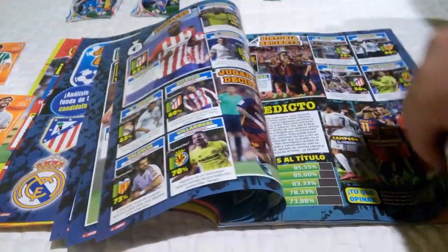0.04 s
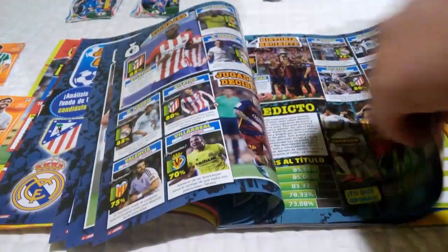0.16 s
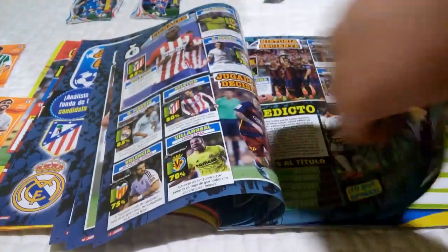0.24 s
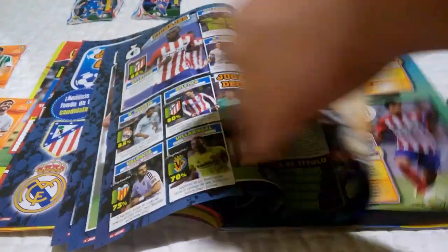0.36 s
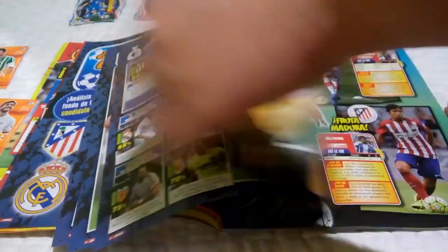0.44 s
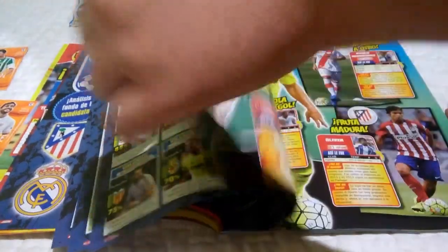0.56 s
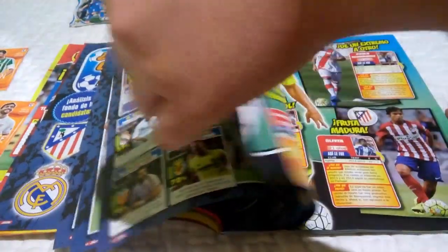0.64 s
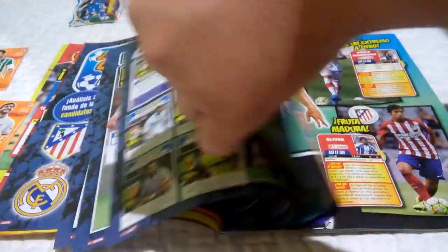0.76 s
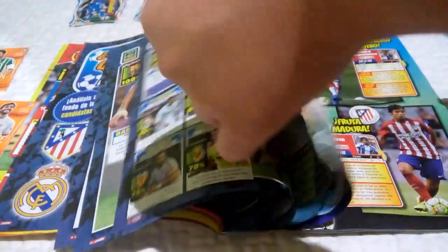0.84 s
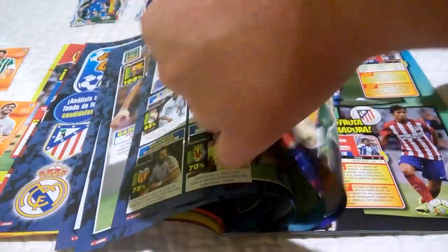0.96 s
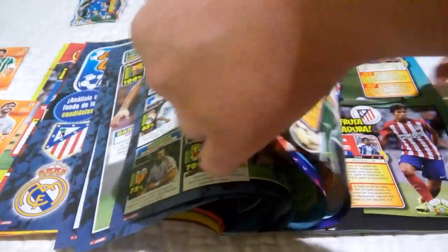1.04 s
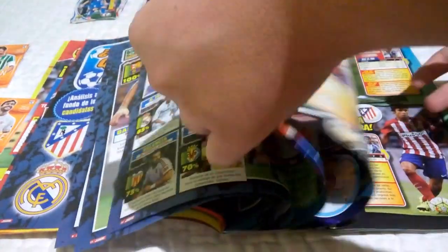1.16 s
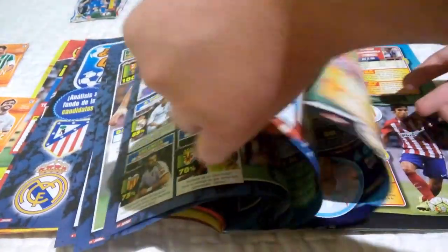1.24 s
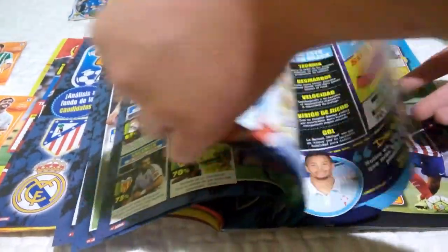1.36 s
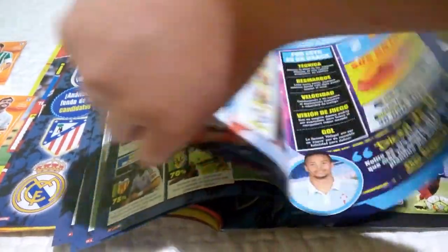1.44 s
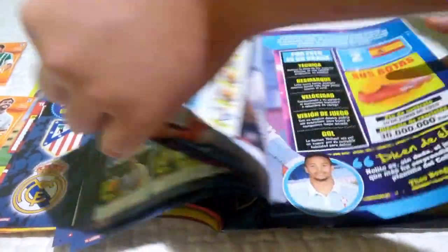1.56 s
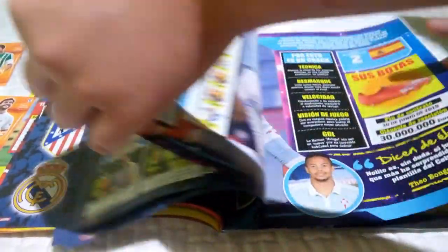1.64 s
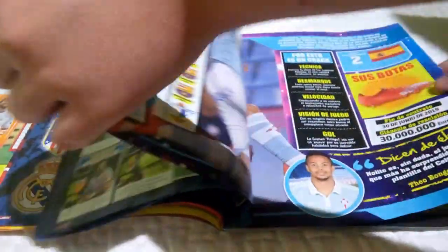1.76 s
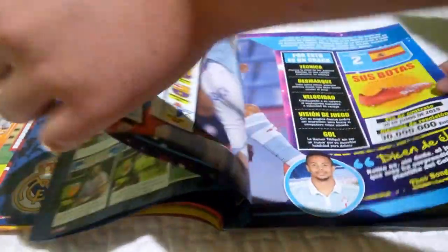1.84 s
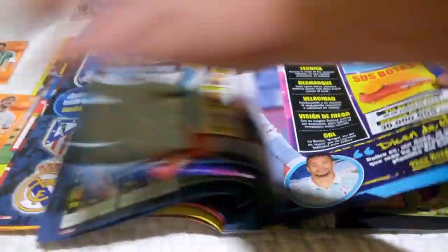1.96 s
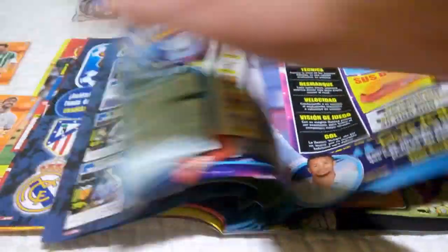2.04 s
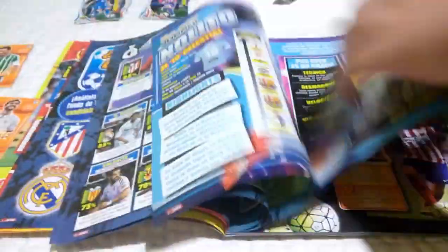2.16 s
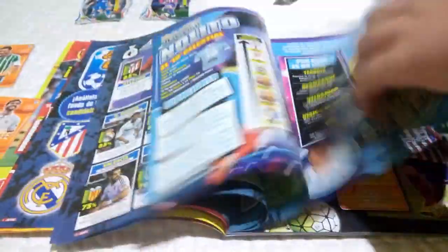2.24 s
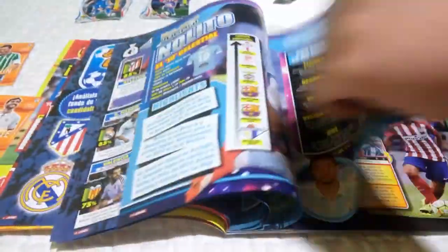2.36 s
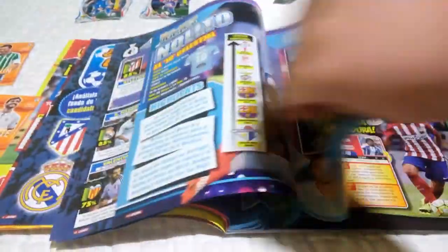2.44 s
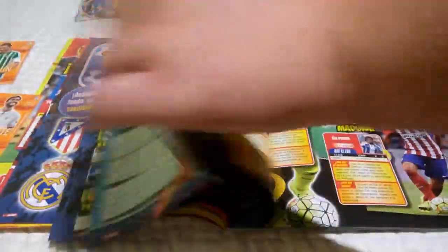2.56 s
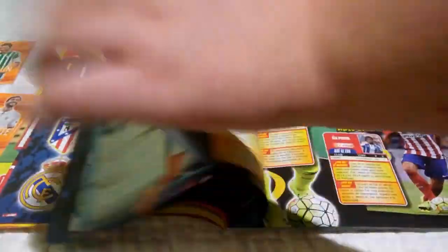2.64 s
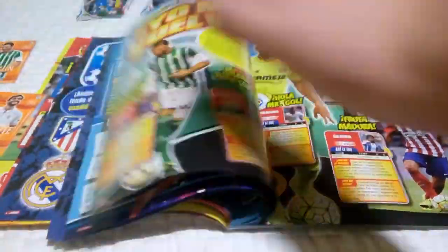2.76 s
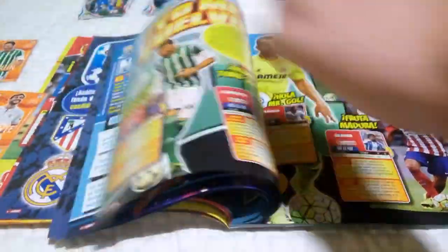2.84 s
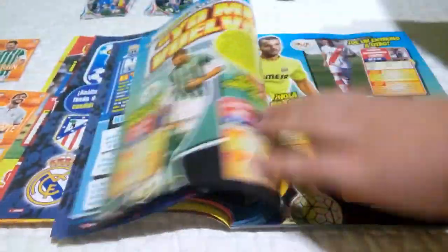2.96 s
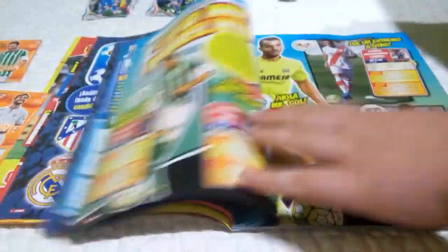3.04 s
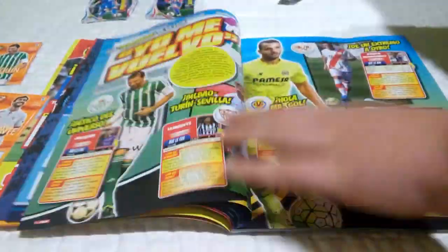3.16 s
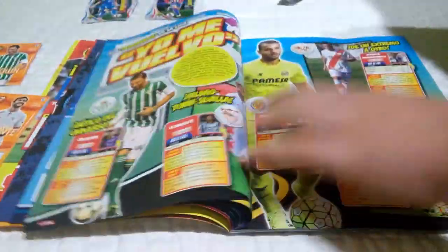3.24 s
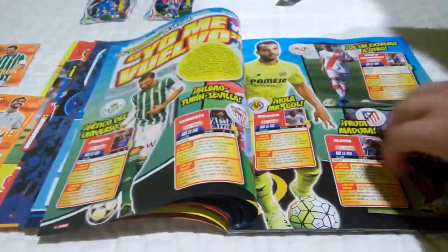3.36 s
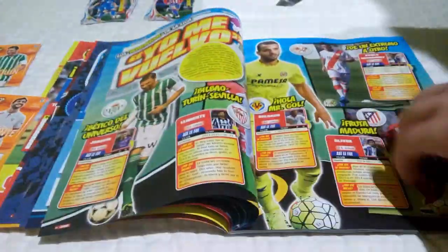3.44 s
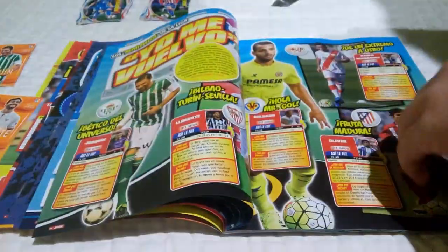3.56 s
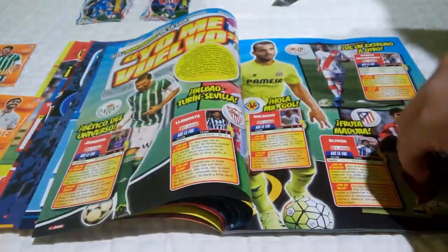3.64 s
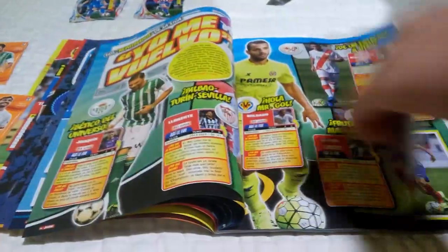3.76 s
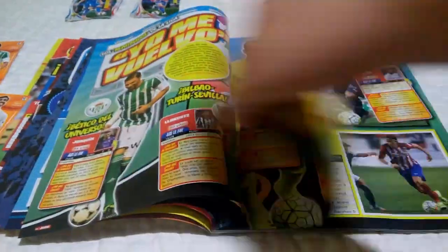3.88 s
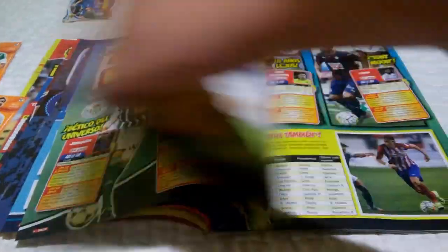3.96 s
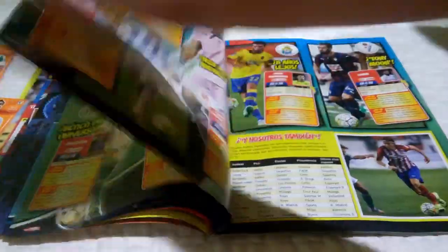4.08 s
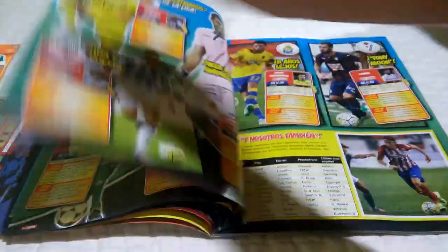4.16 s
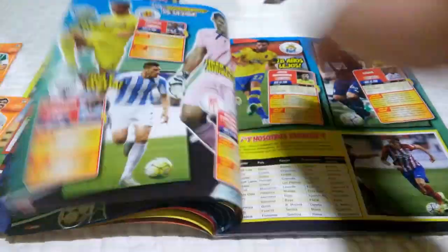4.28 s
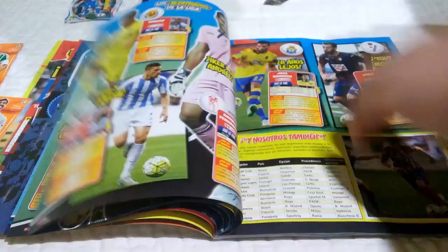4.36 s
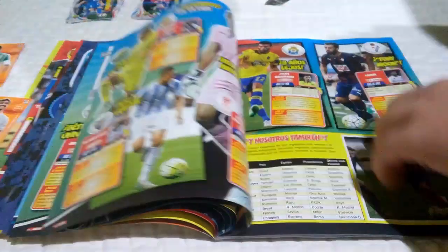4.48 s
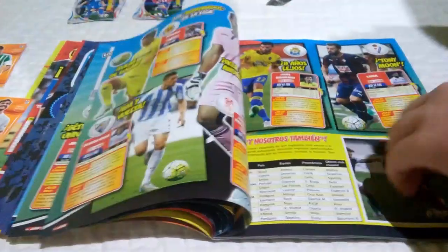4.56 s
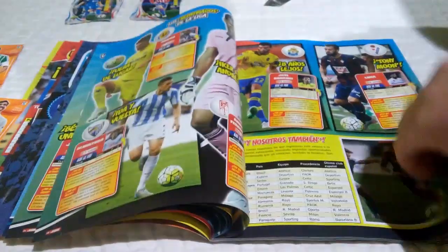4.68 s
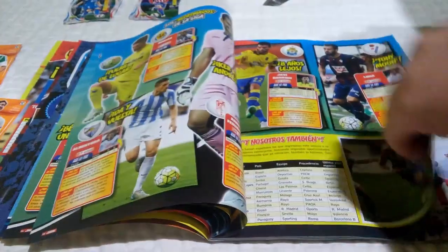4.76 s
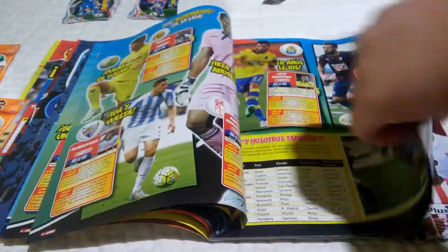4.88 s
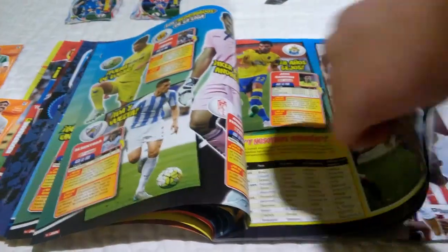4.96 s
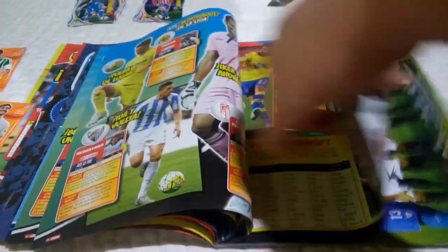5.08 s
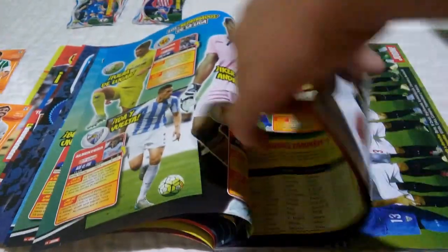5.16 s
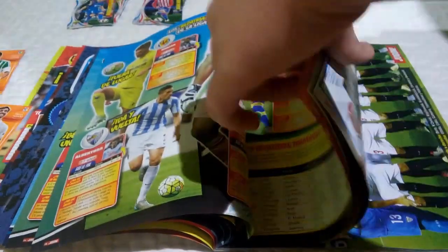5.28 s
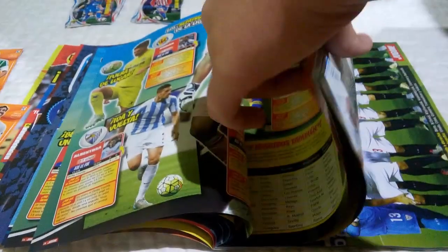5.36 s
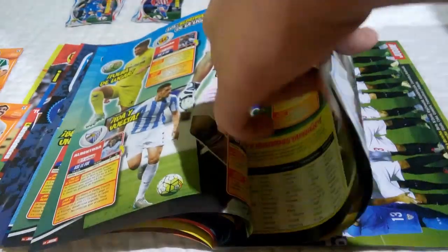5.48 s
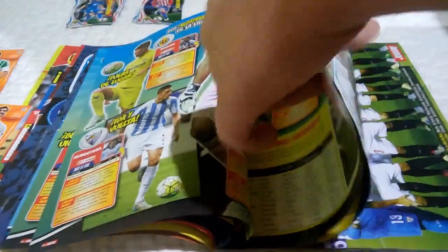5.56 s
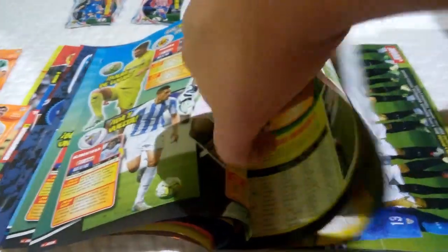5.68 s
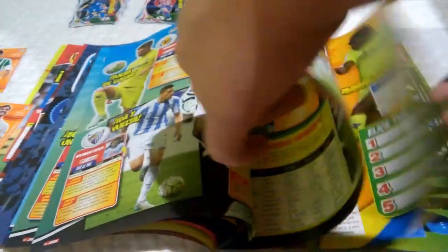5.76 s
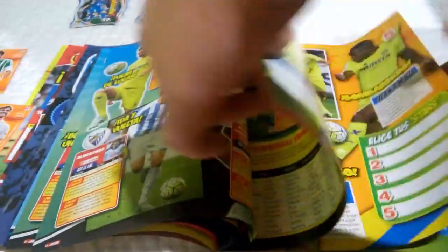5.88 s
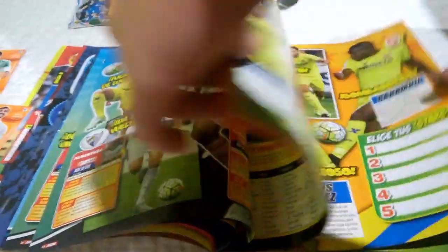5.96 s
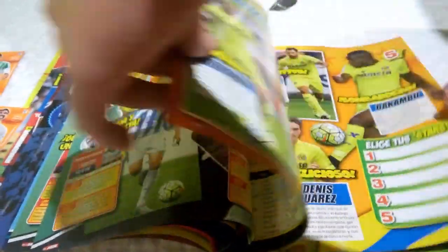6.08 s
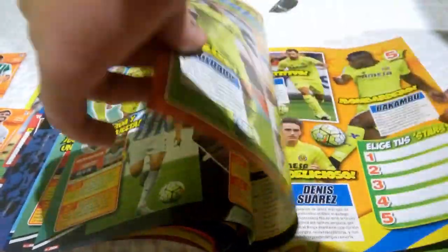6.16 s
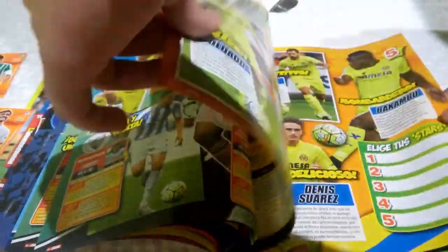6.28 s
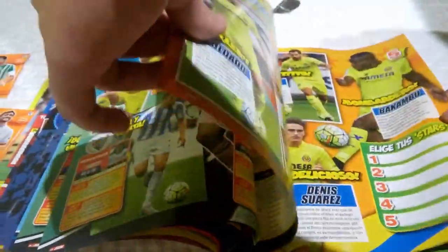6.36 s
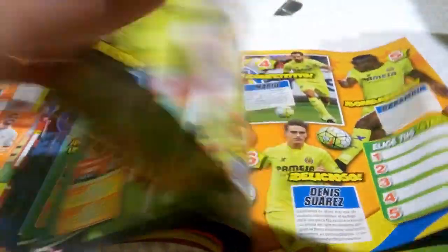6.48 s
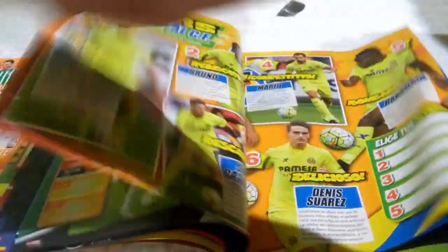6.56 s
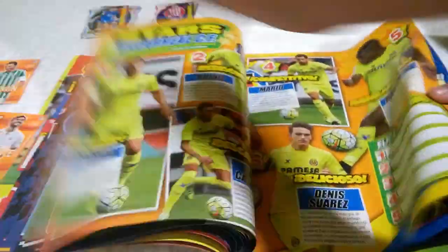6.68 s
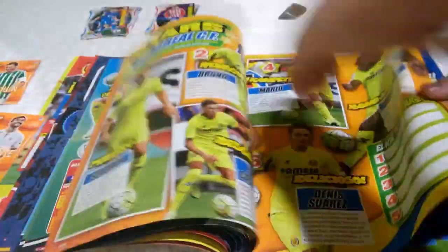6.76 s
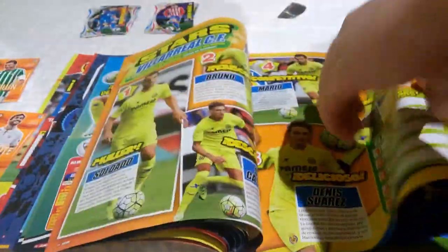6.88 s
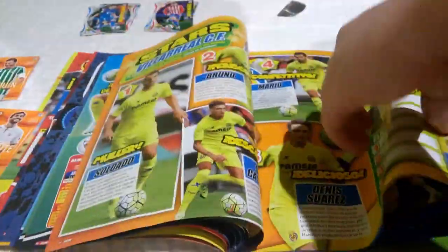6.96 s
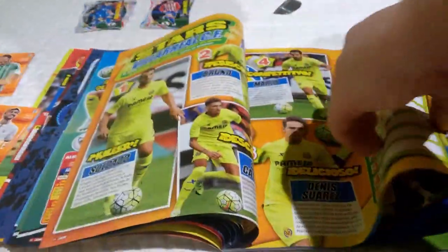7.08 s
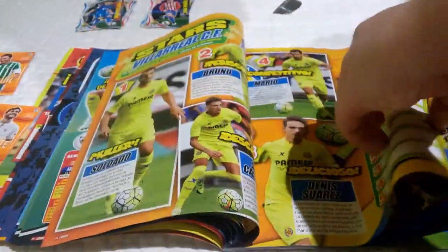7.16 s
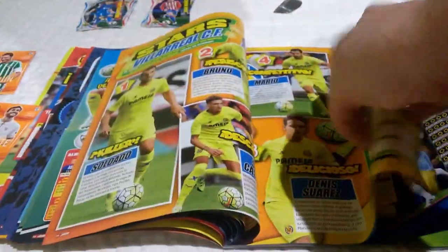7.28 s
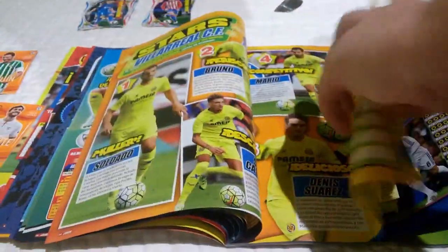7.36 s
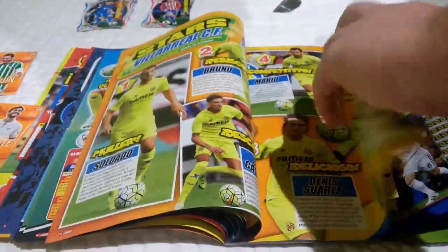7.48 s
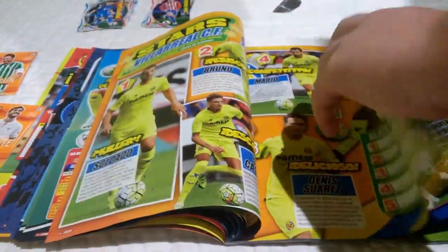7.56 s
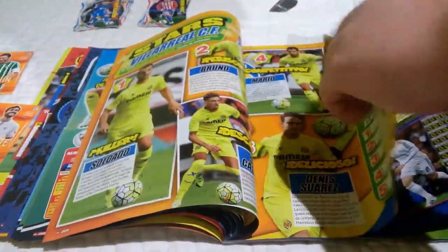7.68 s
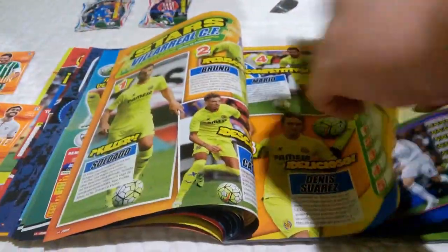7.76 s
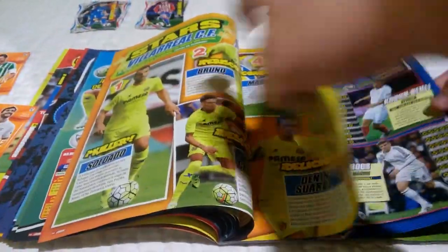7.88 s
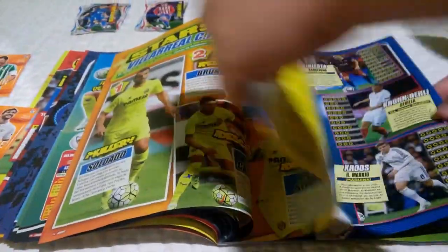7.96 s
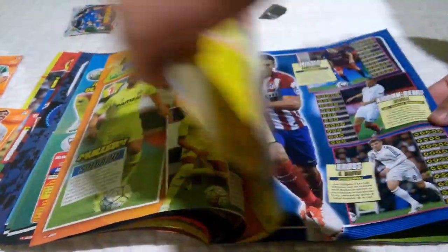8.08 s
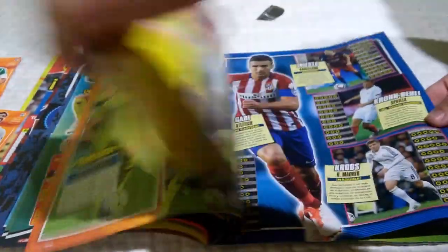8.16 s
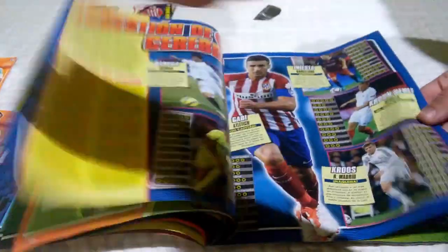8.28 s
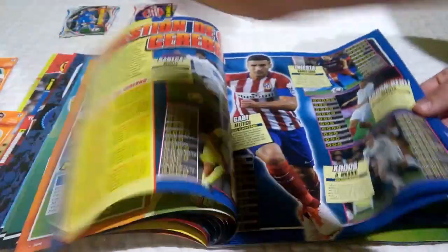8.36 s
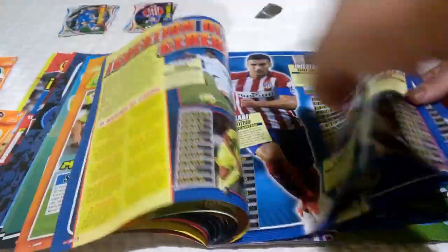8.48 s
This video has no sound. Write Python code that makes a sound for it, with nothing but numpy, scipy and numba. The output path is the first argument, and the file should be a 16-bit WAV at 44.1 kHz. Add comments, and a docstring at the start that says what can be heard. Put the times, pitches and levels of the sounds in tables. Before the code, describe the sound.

Glossy magazine pages are turned by hand, with crisp crackles, sliding rustles and soft flaps at irregular intervals in a quiet room.

```python
"""Glossy magazine pages turned by hand on a bed cover, an arm's length from a small microphone.
Fingers slide over the gloss and creases snap; sheets flap and push low puffs of air near 0.7 s and 2.5 s.
Lighter handling follows from 3 s, then the loudest turns at 6.3-6.8 s and 7.7 s, and rustle to the end.
Throughout, the nearest page echoes and a soft room answers briefly over faint hiss.
The microphone port peaks near 6 kHz and falls steeply above."""
import sys
import numpy as np
from scipy import signal
from scipy.fft import rfft, irfft
from scipy.io import wavfile
from scipy.ndimage import uniform_filter1d, map_coordinates
from numba import njit

SR = 44100
rng = np.random.default_rng(int(sys.argv[2]) if len(sys.argv) > 2 else 0)


def waveform_to_disk(signal):
    """Save audio, clipped to [-1, 1], as 16-bit WAV at the path in sys.argv[1]."""
    frames = np.transpose(np.atleast_2d(signal))
    scaled = np.clip(frames, -1, 1) * 32767
    samples = np.round(scaled).astype(np.int16)
    wavfile.write(sys.argv[1], SR, samples)


N = 376173

# Snapping creases: t/s, crack level/dB, crack f/Hz, sheet level/dB, sheet f/Hz,
# nominal rise/ms, fall/ms, sharpness
CREASES = [(0.02, -62, 4300, -57, 2150, 4, 6, 2.2), (0.088, -36, 6220, -57, 1980, 0.32, 0.87, 3.0),
           (0.0955, -32, 6440, -51, 1670, 0.5, 0.86, 2.1), (0.1113, -48, 5320, -62, 1350, 11, 5.4, 4),
           (0.3263, -42, 5520, -54, 1900, 10, 6.0, 7.9), (0.417, -54, 5430, -62, 1680, 7.2, 6.0, 2),
           (0.436, -46, 5000, -46.5, 1930, 0.3, 1.8, 2.6), (0.6949, -48, 4330, -42, 1608, 2.1, 2.7, 6),
           (0.718, -41, 3680, -50, 1724, 1.7, 2.3, 5.3), (0.736, -30.5, 4940, -41, 2150, 0.69, 1.2, 1.6),
           (0.7526, -21.5, 4180, -28, 1925, 3.6, 3.6, 3.8), (0.7607, -31, 4580, -30, 1856, 1.6, 3, 1.4),
           (0.7661, -49, 4500, -33, 1904, 1.7, 4.9, 1.6), (0.7755, -34.5, 5230, -39, 1850, 0.82, 2, 1.8),
           (0.9696, -59, 5870, -55, 1670, 2, 5, 3.3), (1.0191, -71, 5240, -48.5, 1730, 0.3, 9, 7.2),
           (1.0746, -40, 4170, -46, 1750, 0.52, 4.2, 4.8), (1.0834, -61, 4220, -45, 1410, 10, 5.4, 2.2),
           (1.126, -48.5, 4420, -40.5, 1870, 0.3, 4.5, 4.2), (1.1456, -60, 4150, -51, 1510, 9.3, 6.0, 2.1),
           (1.1993, -59.5, 4060, -53, 1634, 4.7, 3.2, 2.4), (1.2527, -66, 4130, -54.5, 1560, 2.2, 5, 2.5),
           (1.379, -62, 5000, -62, 1760, 1, 2.8, 2.5), (1.455, -65, 3900, -61, 1800, 1, 3, 2.5),
           (1.6256, -41.5, 5570, -59, 1760, 20, 4.3, 8.1), (1.7223, -55, 3950, -53, 1970, 3, 5, 3.6),
           (1.742, -56, 4070, -45.5, 2100, 2.5, 2.7, 7.1), (1.857, -65, 4660, -51.5, 1400, 0.27, 2, 3.6),
           (1.9, -57, 4310, -54.5, 2230, 0.78, 3, 2.6), (2.0152, -57.5, 4900, -65, 1360, 2.2, 7.9, 1.1),
           (2.078, -70, 4150, -57, 1670, .5, 5, 3), (2.1411, -50.5, 4650, -46.5, 1710, 5.8, 9.8, 2.5),
           (2.1769, -49.5, 3700, -45, 1657, 17, 7.1, 1.6), (2.3617, -36, 5370, -39, 1750, 0.23, 1.8, 3.2),
           (2.369, -34.5, 5000, -32.5, 1770, 4, 7.1, 1.2), (2.3745, -40, 5200, -39, 1850, 0.59, 9.5, 1.3),
           (2.451, -46, 5900, -57, 1740, 8.6, 2.5, 3.5), (2.4569, -52, 4550, -40, 1950, 4.5, 7.5, 1),
           (2.4662, -35, 3730, -38.5, 1973, 6.8, 4.1, 1.3),
           (2.499, -38.5, 4570, -38.5, 1270, 3.3, 4.9, 0.93), (2.5193, -38, 4270, -36.5, 1570, 9.2, 11, 1),
           (2.5314, -39.5, 3680, -43, 1360, 8.0, 33, 1.6), (2.552, -47, 4350, -47, 1580, 1, 3.9, 1.3),
           (2.6005, -52.5, 4930, -53, 1650, 8.8, 3.7, 1.6),
           (2.7331, -38.5, 4600, -41.5, 1750, 16, 4.5, 2.2), (2.7443, -44, 5020, -47, 1535, 8.5, 2.8, 1.5),
           (2.9021, -55.5, 4440, -51, 1450, 2.8, 8.7, 4.3), (2.9417, -53, 4230, -58, 1670, 0.54, 1.8, 4.4),
           (3.084, -61, 5600, -66, 1320, 1, 5, 3), (3.2846, -43, 5300, -45.5, 1730, 3, 4, 1.5),
           (3.653, -55.5, 5830, -78, 1275, 3.3, 3.7, 3.0), (3.688, -57, 5020, -66.5, 1450, 0.6, 4.6, 3.5),
           (3.833, -55, 5500, -67, 1097, 0.3, 3.8, 3.7), (4.1307, -74, 4400, -58.5, 1600, .3, 6, 2.7),
           (4.162, -58, 5500, -44.5, 930, 6.1, 3.5, 4.3), (4.1712, -45, 5560, -61, 1220, 0.55, 1.9, 7.7),
           (4.1951, -41, 4750, -57, 1350, 0.63, 2.2, 1.4), (4.2231, -53, 4750, -39, 1470, 12, 1.9, 4.7),
           (4.228, -47.5, 4000, -42.5, 1750, 5.1, 9.6, 1.7), (4.4444, -39, 3830, -46, 1875, 1.2, 11, 4),
           (4.4585, -47, 4030, -37.5, 1700, 1.4, 0.86, 1.9),
           (4.461, -30, 5550, -38.5, 1860, 0.28, 1.7, 1.7), (4.8356, -55, 5670, -96, 1324, 0.4, 1.9, 3.0),
           (4.9994, -58, 5900, -47.5, 1950, 21, 9.4, 15), (5.0105, -49, 5940, -49, 1840, 8.0, 55, 7),
           (5.06, -51, 5770, -54, 1540, 5, 8.7, 5), (5.1519, -46, 5010, -60, 1824, 5.4, 2.1, 3.9),
           (5.3957, -46, 5190, -72, 1490, 8.6, 11, 1.7), (5.6465, -56, 5600, -71, 1580, 2.3, 4.8, 2.6),
           (5.6965, -49.5, 5670, -55, 1780, 0.36, 3.6, 2), (5.8279, -56.5, 4280, -67, 1320, 3.1, 11, 1.7),
           (5.93, -62, 4900, -77, 1400, 3, 5, 5.1), (5.9921, -44, 3780, -33.5, 2100, 1.2, 1.9, 2.9),
           (6.006, -37.5, 3730, -33.5, 1390, 0.93, 3.1, 2.7), (6.013, -50, 4500, -42, 1294, 0.33, 3.6, 1.7),
           (6.0482, -52, 4610, -49.5, 1340, 8.0, 17, 1.6),
           (6.2029, -54.5, 5260, -41.5, 1660, 0.24, 5.2, 6.9),
           (6.2915, -53.5, 5060, -52.5, 960, 0.79, 4.3, 2.9),
           (6.336, -43.5, 5070, -48.5, 1475, 6.4, 4.8, 3.1), (6.35, -55, 5660, -54, 1390, 5.2, 1.2, 4),
           (6.3999, -34.5, 5260, -32.5, 1075, 2.1, 4.1, 3.0),
           (6.4162, -51, 5120, -41, 1190, 0.33, 1.6, 1.1),
           (6.4591, -40.5, 5210, -34.5, 1107, 0.91, 3.2, 2.4), (6.595, -50, 4670, -43.5, 1710, 1.7, 7, 2.7),
           (6.6099, -38.5, 4030, -37, 1407, 1.7, 4.7, 3.0), (6.616, -35, 4160, -33.5, 1817, 0.3, 5.7, 3),
           (6.629, -32.5, 4590, -28, 1550, 0.3, 2.3, 1.1), (6.6474, -29, 4000, -37, 1403, 2.7, 5.6, 1.8),
           (6.6538, -34, 4970, -36, 1505, 0.47, 1.5, 2), (6.679, -18.5, 5100, -34, 1790, 1.9, 4.4, 1.8),
           (6.6846, -35, 5150, -35, 1710, 1.2, 2, 1.6), (6.691, -25, 4630, -32.5, 1880, 2.2, 3, 0.95),
           (6.7225, -32.5, 4200, -29.5, 2010, 5.7, 3, 1), (6.7704, -45, 4660, -44, 1770, 6.1, 15, 1.1),
           (6.806, -33.5, 6200, -48, 1450, 0.33, 2.8, 1.5), (6.8504, -43, 6260, -66, 1760, 10, 6.8, 2.4),
           (6.9029, -67, 5900, -46.5, 1610, 2.5, 7.5, 2), (7.03, -52, 5790, -61, 2010, 1.2, 9.9, 1.8),
           (7.0723, -49, 6340, -66, 2300, 0.3, 5.8, 5.3), (7.116, -44, 5860, -57, 2200, 1.3, 3.2, 5.2),
           (7.136, -48, 6150, -52, 1860, 9.3, 1, 7), (7.346, -48.5, 6140, -66, 1970, 2.5, 11, 11),
           (7.436, -43.5, 5550, -61, 1810, 1, 7.1, 6.2), (7.6752, -44.5, 5420, -51, 1877, 0.3, 6.2, 3.6),
           (7.6939, -19, 5660, -29, 2140, 0.16, 3.5, 6.8), (7.6978, -21.5, 5640, -39, 2090, 0.78, 2, 1.25),
           (7.7209, -39, 5930, -56, 2010, 2.0, 6.9, 3.0), (7.7312, -33, 5830, -45, 2160, 7.6, 3.4, 2.3),
           (7.7516, -23.5, 4700, -35, 2060, 0.54, 1.9, 2), (7.88, -37.5, 5430, -46, 1880, 0.3, 2, 2.7),
           (7.898, -36, 5450, -45, 1920, 0.7, 0.38, 2.4), (7.947, -36.5, 5170, -44, 2000, 2.5, 1.7, 1.6),
           (7.9566, -37.5, 5380, -41.5, 1950, 0.54, 2.9, 2.3), (8.039, -47, 5440, -73, 1525, 0.7, 4.1, 2.9),
           (8.045, -48, 5440, -57, 1690, 1.9, 5, 3.3), (8.0525, -38, 5650, -46, 1650, 2.0, 6.9, 10),
           (8.1238, -51, 4850, -43, 1490, 1.5, 2.8, 4.1), (8.1468, -67, 5250, -49, 1550, 0.8, 1.1, 1.8),
           (8.201, -56, 6070, -67, 1020, 5.5, 8.2, 1.3), (8.2627, -30, 4730, -37, 1220, 0.14, 1.63, 4.8),
           (8.3259, -40, 4900, -37, 1290, 4.8, 4.5, 1.8), (8.356, -35.5, 4960, -40, 1700, 2.6, 6.1, 1.4),
           (8.3608, -62, 5200, -40, 1600, 0.4, 7.9, 2.9), (8.3917, -43.5, 4065, -41, 1600, 6.3, 8, 2),
           (8.406, -44.5, 3580, -42.5, 2150, 11, 25, 2.4), (8.444, -50, 4430, -45, 1460, 8.0, 13, 2.1),
           (8.482, -43.5, 5600, -46.5, 1770, 0.54, 2.9, 5)]
# Strokes over the gloss: peak t/s, 20 dB swell/s, 20 dB fade/s,
# gloss hiss/dB, hollow scrape/dB, stack rustle/dB, moved air/dB
SLIDE_STROKES = [(0.0, .05, 0.082, -68, -52.5, -68, -90), (0.103, 0.035, .07, -51, -64.5, -75, -84),
                 (0.285, 0.037, .1, -54, -59, -79, -75), (0.325, 0.065, .16, -45.5, -52, -63.5, -73),
                 (0.42, 0.087, 0.062, -60, -62, -65.5, -73), (0.6, 0.32, 0.19, -60, -66.5, -63.5, -66.5),
                 (0.76, 0.099, 0.12, -45, -42.5, -53, -56.5), (0.95, 0.17, 0.19, -62.5, -63, -74, -80),
                 (1.099, 0.076, 0.17, -60, -51.5, -60, -67), (1.25, .1, .12, -68.5, -70.5, -72, -70),
                 (1.39, 0.11, .05, -73, -74.5, -87, -72), (1.63, 0.034, 0.17, -69.5, -66.5, -87, -80),
                 (1.754, .1, 0.14, -64, -59.5, -68.5, -77), (1.95, 0.34, 0.29, -66.5, -71, -74.5, -86),
                 (2.15, 0.077, 0.17, -72, -54.5, -67, -74), (2.287, 0.18, .1, -61, -100, -64.5, -70),
                 (2.377, 0.025, 0.073, -47, -44.5, -48.5, -60), (2.45, 0.11, 0.11, -49.5, -51, -70, -74),
                 (2.515, .1, 0.15, -51, -44, -48.5, -60), (2.756, 0.1, 0.065, -48.5, -47, -55.5, -66),
                 (2.93, 0.092, .1, -73, -58, -63, -74), (3.1, .03, 0.35, -61.5, -80, -74, -73.5),
                 (3.173, 0.062, 0.13, -57, -59, -81, -75), (3.294, .03, 0.07, -59.5, -59, -59.5, -82),
                 (3.35, .1, 0.03, -76, -75, -66, -85), (3.45, 0.097, 0.22, -87, -80, -83, -90),
                 (3.66, .07, .12, -67.5, -86, -80, -85), (4.06, 0.12, 0.094, -81, -74, -73, -77),
                 (4.172, 0.02, .12, -55, -66, -75, -79), (4.228, .1, 0.11, -64, -54, -56.5, -66.5),
                 (4.36, 0.16, 0.049, -84.5, -83, -66.5, -86), (4.456, 0.026, 0.071, -61, -50, -54.5, -75),
                 (4.53, 0.092, 0.053, -73, -73, -62.5, -85), (4.84, 0.12, 0.13, -68.5, -85, -81, -73.5),
                 (4.989, 0.036, .2, -53.5, -56.5, -69, -75), (5.13, 0.26, .15, -60, -83, -69, -71),
                 (5.37, 0.056, 0.12, -56, -66, -81, -77), (5.42, 0.083, 0.12, -48, -57, -61, -58),
                 (5.51, 0.19, 0.071, -61.5, -58.5, -65.5, -79), (5.68, 0.093, 0.19, -69, -73.5, -69.5, -66),
                 (5.84, 0.15, 0.084, -67, -73, -77, -78), (5.925, 0.24, 0.059, -59.5, -76, -79, -83),
                 (6.007, 0.027, 0.078, -51.5, -51, -51.5, -57), (6.1, 0.11, .2, -60.5, -65.5, -82, -71),
                 (6.215, .04, .07, -70.5, -77.5, -61.5, -85), (6.346, .12, .08, -65.5, -57.5, -66, -62.5),
                 (6.413, 0.023, 0.041, -56, -49, -61, -44), (6.473, 0.094, 0.078, -57.5, -53.5, -47, -54),
                 (6.615, 0.021, .15, -63, -44.5, -54, -58), (6.646, 0.062, 0.092, -61, -51, -48, -46.5),
                 (6.69, 0.042, .035, -34, -32, -42, -55), (6.732, .05, 0.22, -44.5, -45.5, -63, -62.5),
                 (6.95, 0.44, 0.052, -62, -60, -62.5, -80), (7.05, 0.026, 0.24, -57, -75, -80, -92),
                 (7.135, 0.072, 0.042, -46, -60.5, -91, -95), (7.357, 0.052, 0.11, -53.5, -68, -87, -78),
                 (7.44, 0.18, 0.027, -56, -67, -78, -88), (7.52, 0.082, .3, -80.5, -87, -89, -68),
                 (7.607, 0.072, .05, -62, -78, -81, -78), (7.71, 0.032, 0.16, -45.5, -49, -54, -57.5),
                 (7.89, .07, .2, -53, -51.5, -58, -60), (7.98, 0.18, 0.26, -62, -71, -60.5, -83),
                 (8.2, 0.65, .06, -67.5, -59.5, -62.5, -69), (8.277, 0.023, 0.054, -54, -51.5, -60, -67),
                 (8.338, 0.033, 0.14, -49, -48, -54, -55.5), (8.45, .2, 0.042, -67, -50, -56.5, -80),
                 (8.49, 0.064, .5, -52.5, -58, -67.5, -71)]
# Floor while the hand only holds the page: gloss/dB, hollow/dB, stack/dB, air/dB
HOLD_DB = [-80.5, -85, -83, -86.5]
# Flapping sheets: t/s, peak level/dB, f/Hz
SHEET_FLAPS = [(0.742, -47.5, 261), (2.364, -49, 200), (2.468, -52, 283), (2.54, -52, 129),
               (2.638, -54, 274), (2.728, -55, 164.6), (4.166, -59, 260), (4.208, -50.5, 169),
               (4.447, -60, 157), (5.419, -52, 195), (5.652, -57, 243), (5.699, -59, 226), (6.29, -57, 183),
               (6.335, -45, 197), (6.394, -35.5, 238), (6.414, -43, 188), (6.461, -42.5, 225),
               (6.646, -43, 195), (6.68, -43, 205), (7.514, -50.5, 97.5), (7.591, -55, 102),
               (7.714, -39.5, 231), (7.87, -57, 175), (7.9, -52, 230), (8.12, -59, 301), (8.347, -49, 220)]
# Lifted page held still, reflecting: start t/s, end t/s, start delay/ms, end delay/ms, signed gain
HELD_PAGES = [(0.49, 0.646, 0.45, 0.39, -0.3), (1.146, 1.56, .4, 0.41, -0.26),
              (1.71, 1.85, 0.72, 0.68, -0.25), (1.852, 2.07, 1.46, 1.55, -0.18),
              (2.073, 2.2, 0.43, 0.51, -0.16), (4.95, 5.118, 0.67, 0.76, -0.17),
              (5.738, 5.97, 0.61, 0.68, -0.34), (6.38, 6.43, 0.77, 0.78, 0.13),
              (6.43, 6.57, 0.45, .44, 0.15), (6.647, 6.83, 0.5, 0.54, -0.14),
              (8.012, 8.24, 1.7, 1.6, -0.12), (8.24, 8.313, 0.5, 0.55, .34)]
# Paper treble through the microphone port: f/Hz, level/dB
PORT_SPECTRUM = [(2200, -17), (3000, -11.5), (4300, -10.5), (5000, -10), (5750, -5), (6300, -9.5),
                 (7000, -17), (8000, -23.5), (9000, -19), (9700, -13), (10700, -22), (12500, -23.5),
                 (13600, -14.5), (15500, -30)]
# Room decay: f/Hz, T60/s
ROOM_DECAY = [(300, 0.42), (1400, 0.22), (3700, 0.14), (10000, 0.1)]
# Room hiss and rumble: f/Hz, relative level/dB
HISS_SPECTRUM = [(18, -61), (30, 0.5), (96, 3), (181, 1.5), (1000, -11), (1700, -7.5), (3210, -12),
                 (5590, -13), (7880, -20.5), (9730, -22), (13700, -25), (14800, -32), (16500, -59)]

TICK_SHARPNESS = 3.1  # also the reference for page tautness


def crease_snaps(rows, lead=512):
    """Each crease lets go in a ragged burst: a bright crack, and the sheet around it rings lower."""
    out, port = np.zeros(N), impulse_response(PORT_SPECTRUM, size=256)
    t_ms = (np.arange(2048) - lead) * 1000 / SR
    noise = rng.standard_normal((len(rows), 2, len(t_ms)))
    # fibres give way in jerks under 1 ms long
    jerk_db = 3.93 * rng.exponential(size=(len(rows), 1, len(t_ms) // 32))
    noise *= uniform_filter1d(np.repeat(undb(jerk_db), 32, axis=2), size=16)
    fold_lags = rng.integers(30, 110, len(rows))  # samples; second path via the facing fold
    for row, fold_lag, (crack_noise, sheet_noise) in zip(rows, fold_lags, noise):
        at_s, crack_db, crack_hz, sheet_db, sheet_hz, rise_ms, fall_ms, sharp = row
        from_release = np.where(t_ms < 0, -1.2 * t_ms / rise_ms, t_ms / fall_ms)
        burst = np.exp(-from_release ** 1.75)
        tear = crack_noise * burst
        splash = 0.33 * (crack_hz / 5600) ** 1.3 * tear  # tight creases reach further into the treble
        tone = band(band(tear, crack_hz, 0.23 * sharp), crack_hz, 1.64 * sharp)
        crack = np.convolve(splash + np.sqrt(sharp) * tone, port)[:len(t_ms)]
        flex = band(sheet_noise * burst, sheet_hz, 0.59, passes=2)
        ring = np.sqrt(sharp) * band(flex, sheet_hz, sharp) + 0.3 * flex / sharp
        ring = uniform_filter1d(ring, size=4)  # port roll-off
        for part, level_db in ((crack, crack_db), (ring, sheet_db)):
            part = part + 0.33 * np.roll(part, fold_lag)
            peak_rms = np.sqrt(uniform_filter1d(part ** 2, size=80).max())
            add(out, at_s - lead / SR, part * undb(level_db) / peak_rms)
    return out


def small_creases(count=90, over_db=1, scatter_db=3, max_db=-56):
    """Extra CREASES rows: ticks at random times, about as loud as the stroke that bends them."""
    at_s = rng.uniform(0.02, 0.98, count) * N / SR
    draws = rng.standard_normal((count, 4)).T
    gloss_and_hollow_db = np.array(stroke_levels_db(at_s)[:2])
    crack_db, sheet_db = np.minimum(gloss_and_hollow_db + over_db + scatter_db * draws[:2], max_db)
    crack_hz, sheet_hz, _ = page_bend(at_s)
    rise_ms, fall_ms = 0.8 * np.exp(draws[2]), 3.2 * np.exp(draws[3] / 2)
    sharp = np.full(count, TICK_SHARPNESS)
    return list(zip(at_s, crack_db, crack_hz, sheet_db, sheet_hz, rise_ms, fall_ms, sharp))


def page_slide():
    """Skin rubs gloss; the hollow under the sheet colours the scrape, the stack rustles, air stirs."""
    t_s, grid_s = np.arange(N) / SR, np.arange(0, N / SR, 1 / 500)
    gloss_db, hollow_db, stack_db, air_db = (np.interp(t_s, grid_s, db) for db in stroke_levels_db(grid_s))
    gloss_hz, hollow_hz, sharp = page_bend(t_s)
    taut = sharp / TICK_SHARPNESS
    # the gloss band widens as it rises over the scrape
    gloss_q = np.maximum(2.48 * np.exp(-0.03 * (gloss_db - hollow_db)) * taut ** 0.37, 0.5)
    hollow_q = np.maximum(1.58 * taut ** 0.66, 0.6)
    slips = grit(scatter_db=2.63, clump_db=2.03, clump_hz=90)
    gloss = 0.38 * slips / gloss_q + np.sqrt(gloss_q) * band(slips, gloss_hz, gloss_q)
    gloss = signal.fftconvolve(gloss, impulse_response(PORT_SPECTRUM))[:N]
    rub = band(grit(scatter_db=2.6, clump_db=2.6, clump_hz=60), hollow_hz, 0.65)
    hollow = np.sqrt(hollow_q) * band(rub, hollow_hz, hollow_q)
    stack = band(grit(scatter_db=2.35, clump_db=2.6, clump_hz=40), f_hz=745, q=0.77, passes=2)
    air = band(grit(scatter_db=1.0, clump_db=2.7, clump_hz=30), f_hz=210, q=0.6, passes=3)
    layers = ((gloss, gloss_db), (hollow, hollow_db), (stack, stack_db), (air, air_db))
    return sum(unit_rms(x) * undb(level_db) for x, level_db in layers)


def stroke_levels_db(t_s, roundness=1.19):
    """Gloss, hollow, stack and air levels: strokes swell, fade and add in power over the floor."""
    peak_s, swell_s, fade_s, *peaks_db = np.transpose(SLIDE_STROKES)[:, :, None]
    from_peak = np.where(t_s < peak_s, (peak_s - t_s) / swell_s, (t_s - peak_s) / fade_s)
    shape_db = -20 * from_peak ** roundness
    return [10 * np.log10(np.sum(undb(peak_db + shape_db) ** 2, axis=0) + undb(floor_db) ** 2)
            for peak_db, floor_db in zip(peaks_db, HOLD_DB)]


def page_bend(t_s):
    """The bend of the page drifts from crease to crease, and with it pitch and sharpness."""
    at_s, _, crack_hz, _, sheet_hz, _, _, sharp = np.transpose(CREASES)
    return [np.interp(t_s, at_s, column) for column in (crack_hz, sheet_hz, sharp)]


def grit(scatter_db, clump_db, clump_hz):
    """Friction: dense tiny slips of very unequal size, in clumps."""
    size_db = scatter_db * rng.exponential(size=N) + clump_db * wander(clump_hz)
    return rng.standard_normal(N) * undb(size_db)


def sheet_flaps(rise_s=0.0011, t60_s=0.04):
    """A whole sheet swings over and shoves the air for a cycle or two."""
    out, t_s = np.zeros(N), np.arange(8192) / SR
    envelope = (1 - np.exp(-t_s / rise_s)) * np.exp(-np.log(1000) * t_s / t60_s)
    for at_s, peak_db, f_hz in SHEET_FLAPS:
        swing = np.sin(2 * np.pi * f_hz * t_s) * envelope
        puff = band(swing, f_hz, 0.95)  # a small sheet radiates little far from its swing frequency
        add(out, at_s, undb(peak_db) * puff / np.abs(puff).max())
    return out


def page_echo(x, hold_s=0.14):
    """The nearest page or hand reflects the sound; delay and gain are random unless a page is held."""
    t_s = np.arange(N) / SR
    step = np.arange(N) // int(hold_s * SR)
    draws = rng.standard_normal((N // 2000, 2))[step].T
    delay_ms = 0.68 * np.exp(0.35 * draws[0])
    gain = -0.073 + 0.17 * draws[1]
    for start_s, end_s, start_ms, end_ms, held_gain in HELD_PAGES:
        held = (t_s >= start_s) & (t_s < end_s)
        delay_ms[held] = np.interp(t_s[held], [start_s, end_s], [start_ms, end_ms])
        gain[held] = held_gain
    lag = uniform_filter1d(delay_ms * SR / 1000, size=300)
    return uniform_filter1d(gain, size=300) * map_coordinates(x, [np.arange(N) - lag], order=1)


def room_reverb(x, level_db=-14.5, rise_s=0.0016):
    """Diffuse tail of a soft room: octave bands of noise, treble dying first."""
    t_s, tail = np.arange(SR // 2) / SR, 0
    f_hz, t60_s = np.transpose(ROOM_DECAY)
    for centre_hz in 125 * 2. ** np.arange(7):
        band_t60_s = np.interp(np.log(centre_hz), np.log(f_hz), t60_s)
        decay = np.exp(-np.log(1000) * t_s / band_t60_s)
        tail += band(rng.standard_normal(len(t_s)), centre_hz, 1.0) * decay
    tail *= 1 - np.exp(-t_s / rise_s)
    return undb(level_db) * signal.fftconvolve(x, tail / np.sqrt(np.sum(tail ** 2)))[:N]


def room_tone(level_db=-72, waver_db=1.0):
    """Faint hiss and rumble, wavering a little."""
    colour = impulse_response(HISS_SPECTRUM, size=4096)
    hiss = signal.fftconvolve(rng.standard_normal(N + 4096), colour, "valid")[:N]
    return unit_rms(hiss) * undb(level_db + waver_db * wander(rate_hz=3.2))


def impulse_response(spectrum, size=1024):
    """Minimum-phase filter from (f/Hz, level/dB) points."""
    f_hz, level_db = np.transpose(spectrum)
    bins_hz = np.arange(size + 1) * SR / (2 * size) + 1
    gain = undb(np.interp(np.log(bins_hz), np.log(f_hz), level_db))
    cepstrum = irfft(np.log(gain))
    cepstrum[1:size] *= 2
    cepstrum[size + 1:] = 0
    return irfft(np.exp(rfft(cepstrum)))[:size]


@njit
def svf(x, f_hz, q):
    """State-variable band-pass, tuned per sample; gain 1 at the centre."""
    y, band_state, low_state = np.empty(len(x)), 0., 0.
    for i in range(len(x)):
        g, damping = np.tan(np.pi * f_hz[i] / SR), 1 / q[i]
        v = (band_state + g * (x[i] - low_state)) / (1 + g * (g + damping))
        band_state = 2 * v - band_state
        low_state += 2 * g * v
        y[i] = damping * v
    return y


def band(x, f_hz, q, passes=1):
    """Band-pass cascade, steady or moving."""
    for _ in range(passes):
        x = svf(x, f_hz * np.ones(len(x)), q * np.ones(len(x)))
    return x


def wander(rate_hz):
    """Slewed random steps, rms 1."""
    hold = int(SR / rate_hz)
    steps = np.repeat(rng.standard_normal(N // hold + 1), hold)
    return unit_rms(uniform_filter1d(steps, hold)[:N])


def undb(db):
    return 10 ** (np.asarray(db) / 20)


def unit_rms(x):
    return x / np.sqrt(np.mean(x ** 2))


def add(out, at_s, piece):
    start = int(at_s * SR)
    out[start:start + len(piece)] += piece[:len(out) - start]


def scene():
    """Paper, its echo and the room; mono."""
    paper = crease_snaps(list(CREASES) + small_creases()) + page_slide()
    near = paper + page_echo(paper) + sheet_flaps()
    return (near + room_reverb(near) + room_tone())[None]


def record(dry, bass_hz=58, top_hz=16500):
    """The small capsule loses the deepest bass; a steep low-pass cuts the top."""
    capsule = signal.sosfilt(signal.butter(1, bass_hz, "high", fs=SR, output="sos"), dry)
    return signal.sosfilt(signal.ellip(10, 0.2, 70, top_hz, fs=SR, output="sos"), capsule)


dry = scene()
out = record(dry)
waveform_to_disk(out)
```